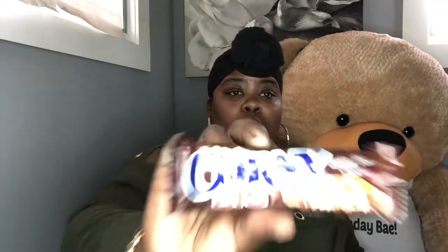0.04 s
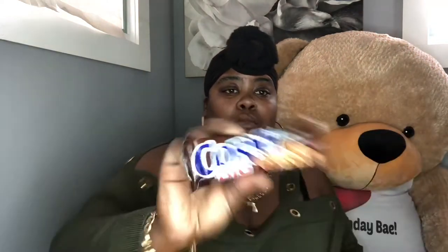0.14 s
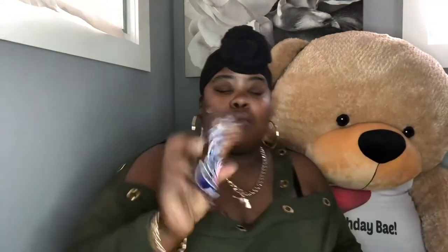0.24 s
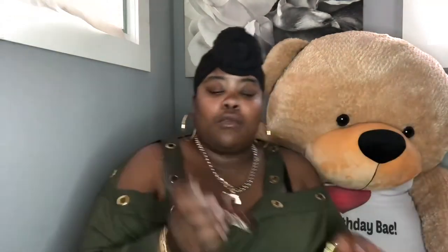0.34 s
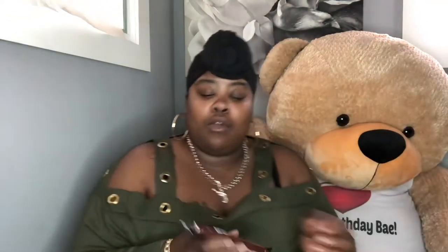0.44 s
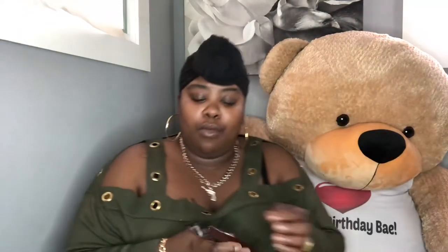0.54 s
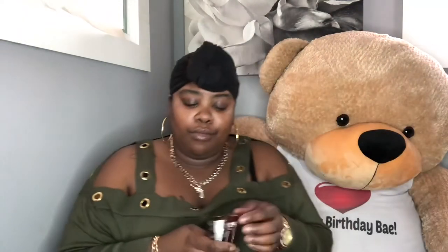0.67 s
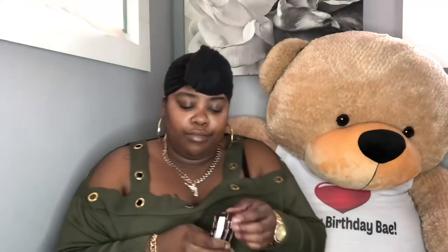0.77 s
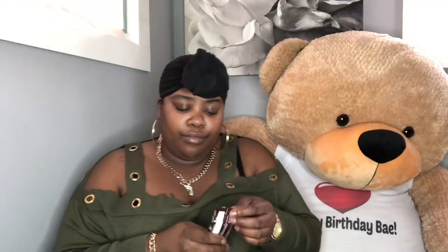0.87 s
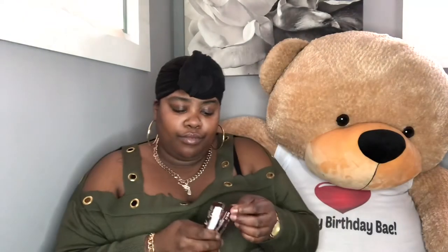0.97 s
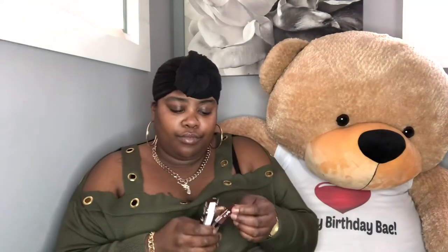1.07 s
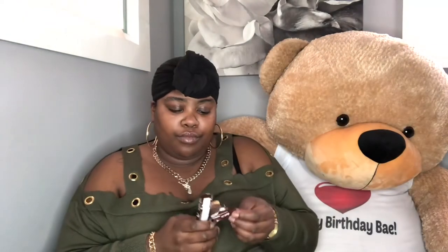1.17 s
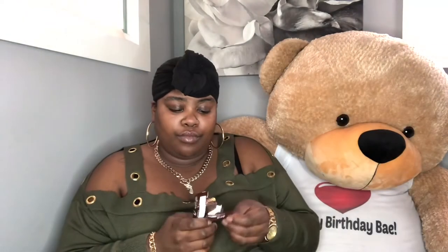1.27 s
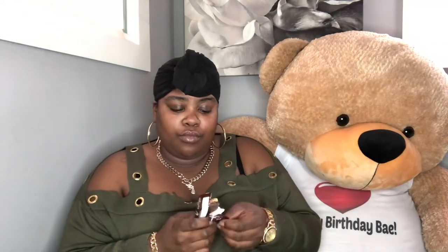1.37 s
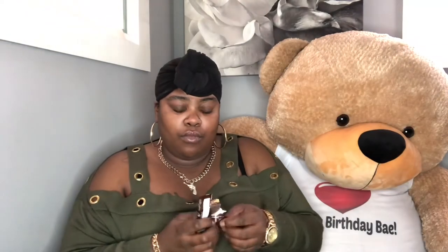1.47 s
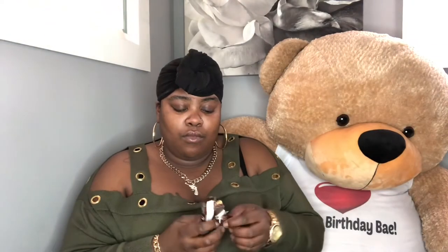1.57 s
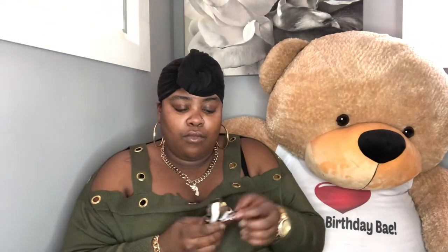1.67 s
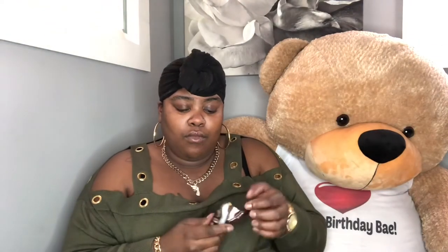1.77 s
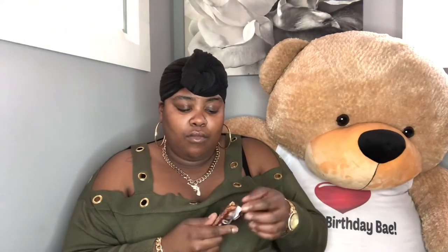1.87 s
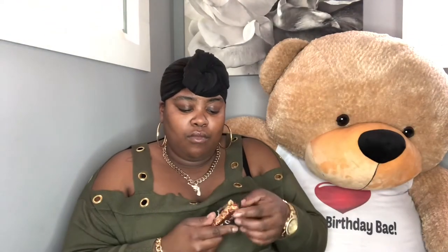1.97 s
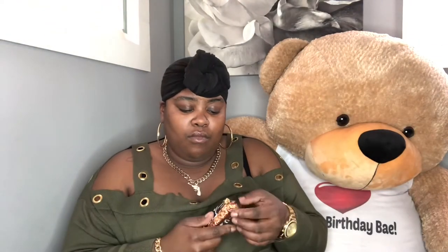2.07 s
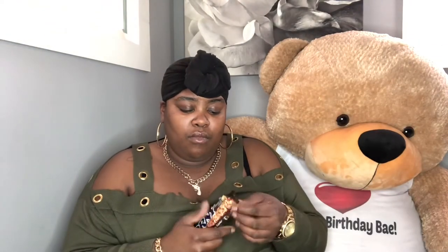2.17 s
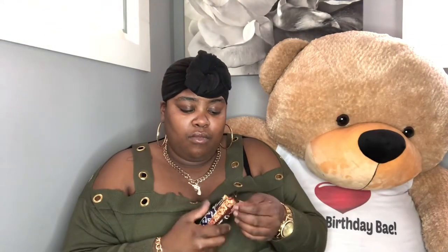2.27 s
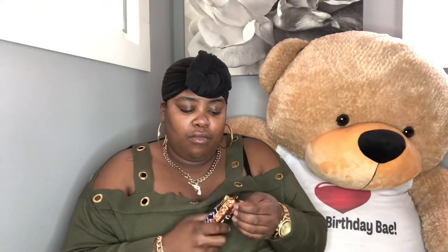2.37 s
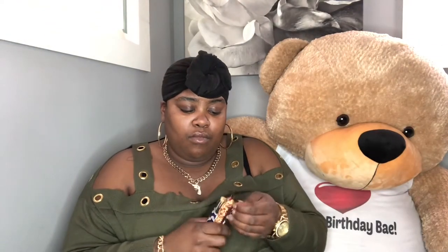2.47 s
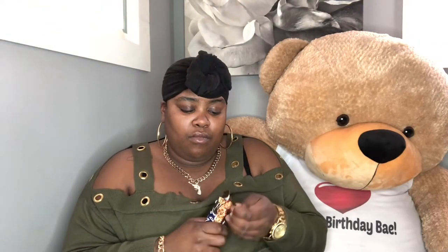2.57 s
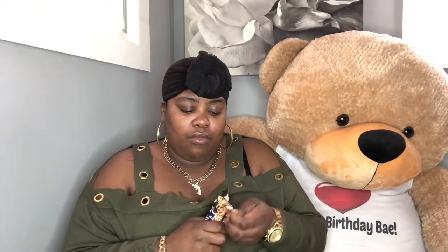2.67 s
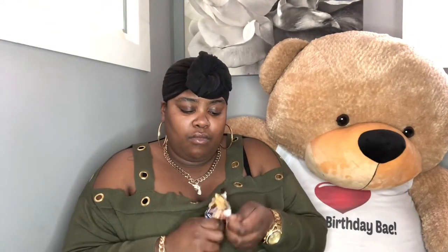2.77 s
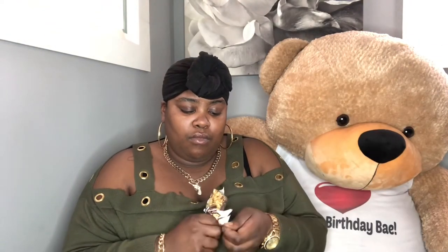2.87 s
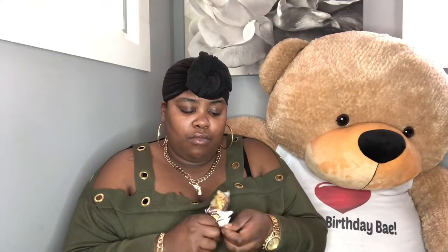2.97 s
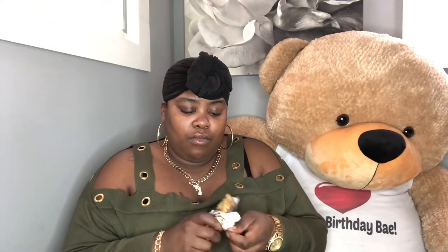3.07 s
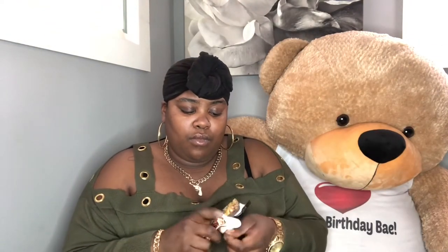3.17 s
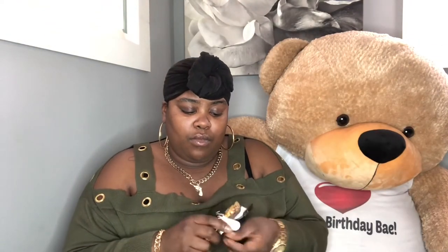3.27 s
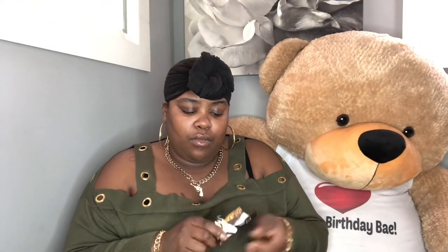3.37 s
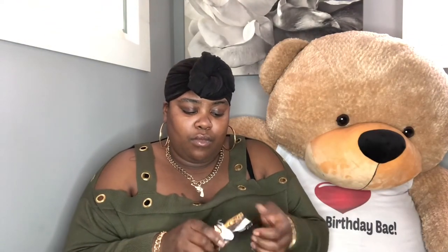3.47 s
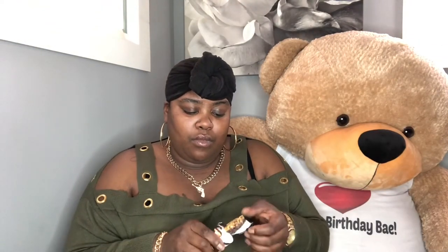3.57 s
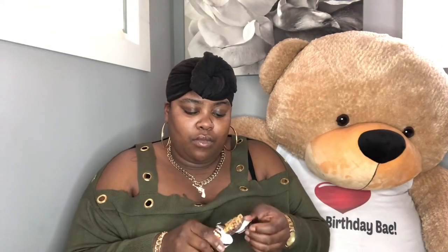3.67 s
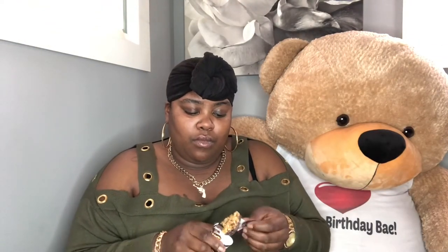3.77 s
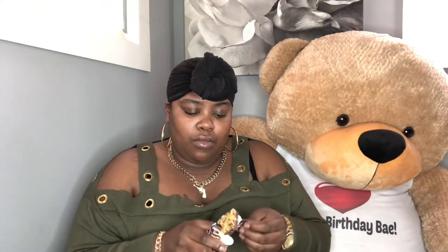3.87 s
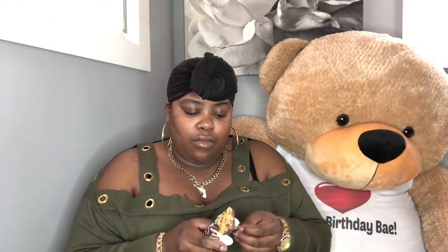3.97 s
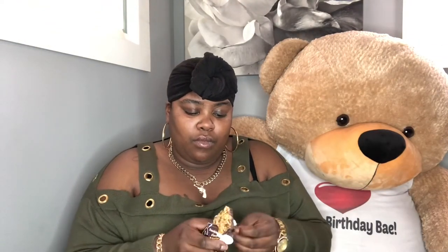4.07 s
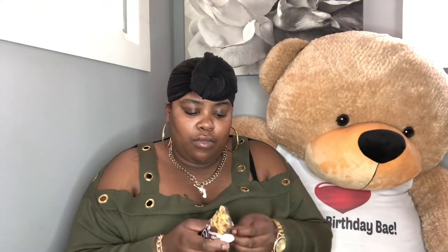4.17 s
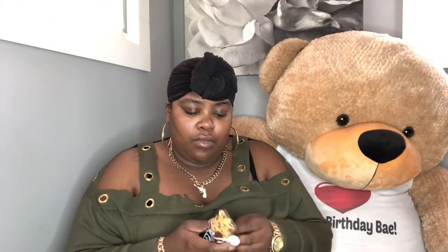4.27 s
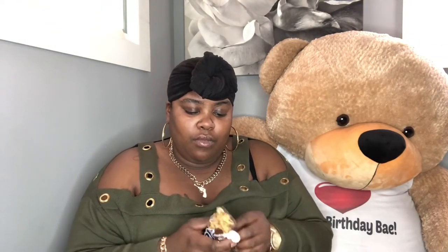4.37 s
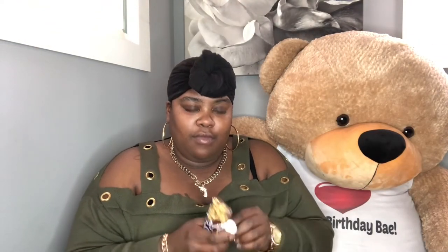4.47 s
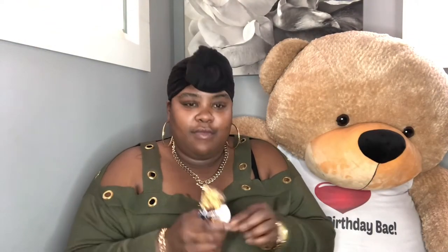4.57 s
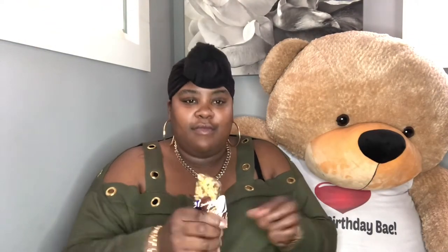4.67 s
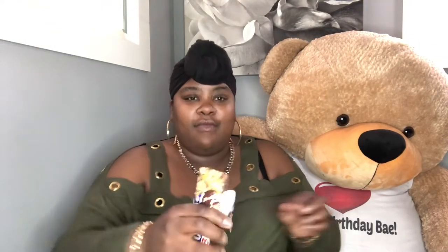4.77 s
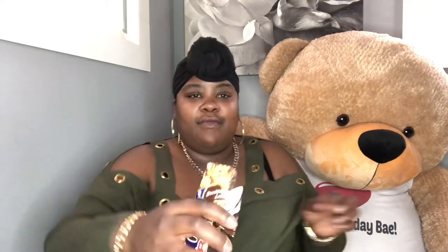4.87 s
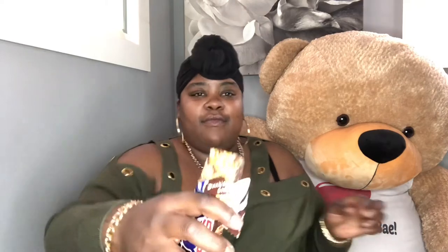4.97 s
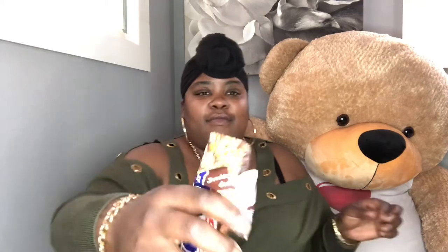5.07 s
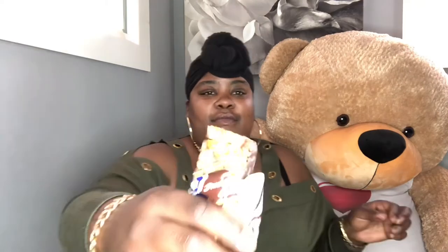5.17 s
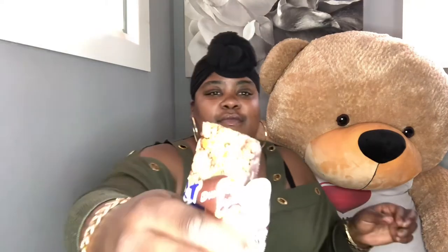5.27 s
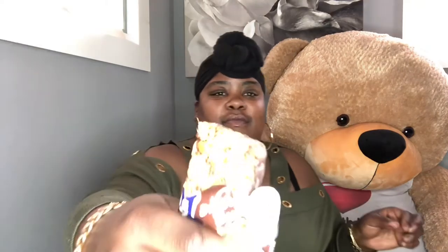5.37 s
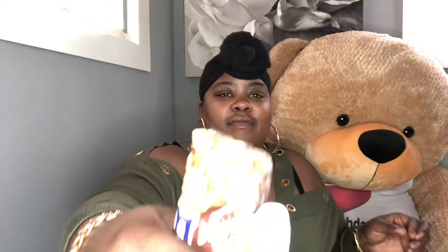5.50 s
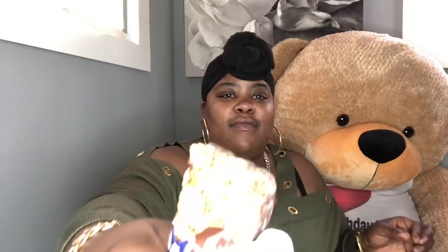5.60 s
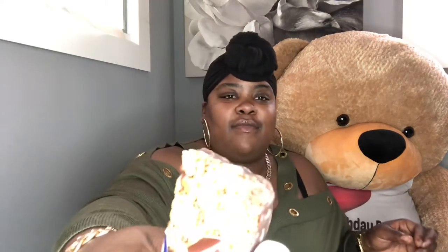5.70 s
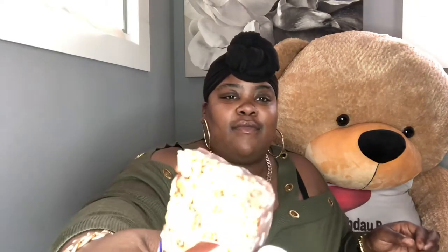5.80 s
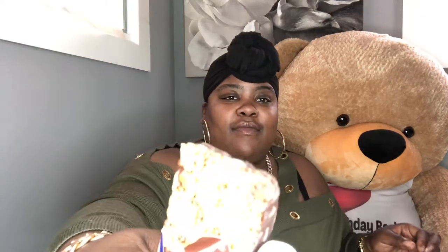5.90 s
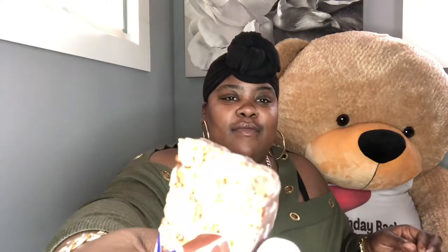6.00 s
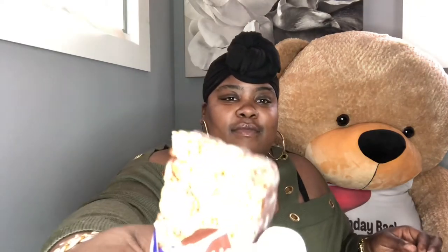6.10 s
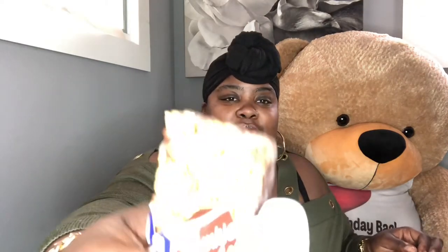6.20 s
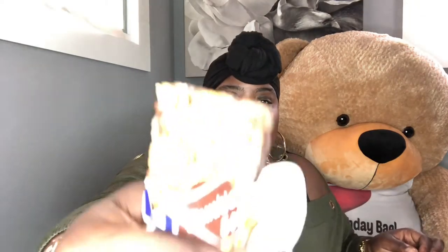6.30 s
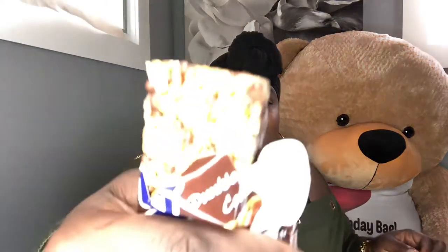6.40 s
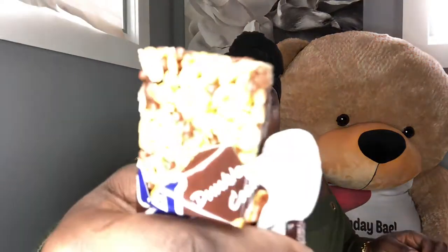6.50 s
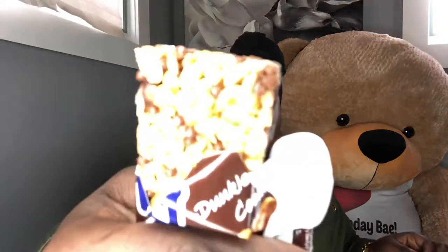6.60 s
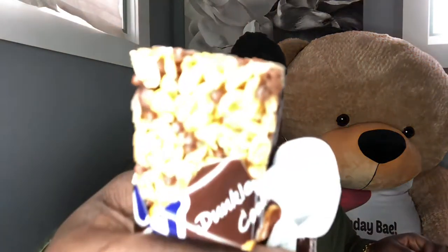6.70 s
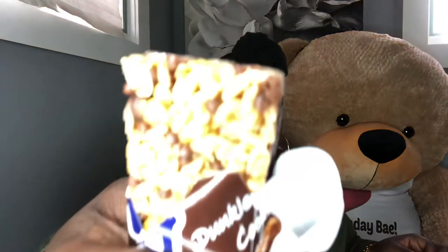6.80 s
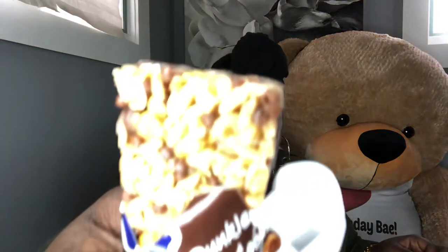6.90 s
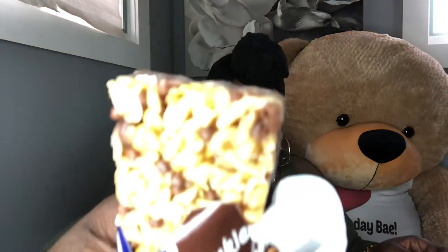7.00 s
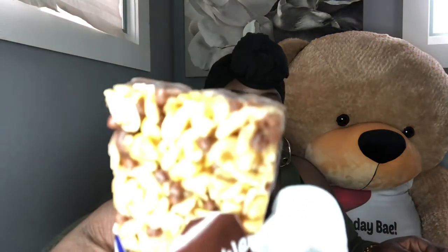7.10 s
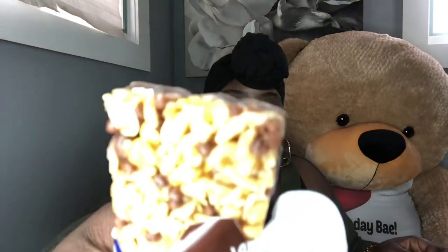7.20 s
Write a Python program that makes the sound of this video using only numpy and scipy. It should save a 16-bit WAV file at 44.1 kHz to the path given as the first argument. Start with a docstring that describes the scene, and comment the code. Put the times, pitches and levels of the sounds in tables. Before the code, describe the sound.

A quiet small furnished room with faint air noise and a barely audible, wavering low hum. At about 0.3-0.5 s a thin plastic wrapper is gripped in a quick bright flurry of crackles, with a tiny high metallic bracelet ping. A near pause follows, with one crisp snap at 1.0 s. From 1.3 to 1.7 s sharp creases snap in clusters, two or three standing out. Lighter crinkling leads to the densest tearing at 2.4-3.0 s, with bright snaps, dull panel pops and squeezed rustling. From 3.1 to 4.9 s irregular softer crackles and short rustles continue, with sharper ticks near 3.7, 4.0 and 4.55 s and a small cluster at 4.9. Then mostly quiet, with a pop at 5.5 s. A brief light crinkle comes at 6.2-6.5 s, nearer and drier, fading to room tone by about 7 s.

```python
"""Snack wrapper torn and crinkled

A thin plastic wrapper is torn and crinkled by hand in a small furnished room, over a faint low hum.
Creases snap as pitched noise bursts, panels pop dully, and squeezed film rustles as clumps of tiny
ringing crackles. Bracelet links ping as damped sines; bounces and a diffuse tail make the room."""
import sys
import numpy as np
from scipy import signal
from scipy.fft import rfft, irfft, next_fast_len
from scipy.io import wavfile
from scipy.ndimage import uniform_filter1d

SR = 44100
rng = np.random.default_rng(int(sys.argv[2]) if len(sys.argv) > 2 else 0)


def dump(signal):
    """Clip the signal to [-1, 1] and save it as 16-bit WAV at the path in sys.argv[1]."""
    limited = np.clip(np.atleast_2d(signal).T, -1, 1)
    pcm = np.round(limited * 32767).astype(np.int16)
    wavfile.write(sys.argv[1], SR, pcm)


def ratio(d):
    """dB to gain"""
    e = np.asarray(d, float) / 20
    return 10 ** e


N = 319725   # samples

# Room tone colour: (frequency [Hz], relative density [dB per Hz])
AIR_COLOUR = [(25, -15), (36, -12), (70, -2.5), (98, -5.5), (163, -10.5), (286, -8.5), (431, -12.5),
              (520, -14), (950, -19.5), (1960, -25.5), (3000, -30.5), (7600, -36), (8400, -38.5),
              (15000, -42)]
AIR_RMS_DB = -63
# Low hum that swells and fades: (time [s], rms level [dB])
HUM_LEVEL = [(0.0, -71), (0.06, -66), (0.62, -90), (0.97, -63), (2.3, -85), (2.48, -65), (2.82, -70),
             (3.01, -90), (3.25, -62), (3.47, -65), (3.53, -82), (3.82, -57), (4.18, -66), (4.7, -57),
             (5.09, -71.5), (7.25, -72)]
HUM_HZ, HUM_SPREAD_HZ = 48.8, 3.52
# Diffuse room tail: (frequency [Hz], t60 [s], level [dB])
ROOM_TAIL = [(400, 0.015, -1.5), (930, 0.33, -7), (2490, 0.15, -6), (5000, 0.18, -7.5), (8000, 0.16, -3.5),
             (14100, 0.11, -12)]
# Bounces off hands, chest and wall: (delay [s], level [dB])
BOUNCES = [(.0021, -23.5), (.0034, -25), (.0085, -49.5)]
# The wrapper comes towards the microphone and the room falls away: (time [s], room share [dB])
ROOM_SHARE = [(0, -0.5), (.9, -1), (4.9, -3.5), (5.2, -2.5), (6.2, -6.5), (7.25, -28)]
# Bracelet links touching: (time [s], click level [dB])
LINK_TOUCHES = [(0.4635, -40), (0.509, -45)]
# Modes of a link: (frequency [Hz], level over click [dB], t60 [s])
LINK_MODES = [(12500, 2, 0.023), (7000, -14, .004)]
# Whole panels flipping over with a dull pop: (time [s], peak level [dB])
PANEL_POPS = [(0.3991,-45.5),(0.4387,-46),(.4438,-35),(1.2945,-40.5),(1.7104,-46),(1.9507,-46.5),(2.1743,-41),(2.493,-40.5),(2.545,-38),
              (2.5592,-37.5),(2.6325,-46),(2.6523,-39),(2.7815,-38),(2.7907,-37.5),(2.8068,-29.5),(2.8544,-39),(2.9854,-43),(2.9989,-33.5),(3.3425,-43),(3.3464,-43),
              (3.653,-44),(4.0208,-40),(4.2033,-42.5),(4.4048,-43.5),(4.5432,-43.5),(4.5577,-41),(4.6783,-37),(4.8697,-50),(4.9168,-44),(5.5002,-33),
              (6.2827,-44.5),(6.4379,-48),(6.5474,-48.5)]
POP_FALL_S = 0.0032   # time to lose 10 dB
# Fingers squeezing the film: (time of firmest grip [s], rustle level [dB],
# time held before it [s, sign ignored], brightness [dB per octave])
SQUEEZES = [(.34,-63.5,.01,-3.5),(0.447,-50,0.013,-4),(1.03,-59.5,0.035,0.5),(1.2,-65,.05,1),(1.5,-60.5,0.22,1.5),(1.68,-58,0.031,-1),(1.92,-59,0.019,1),
            (2.1,-66.5,0.068,-0.5),(2.19,-55.5,0.012,-3),(2.33,-59.5,0.016,-2),(2.48,-53.5,.03,-0.5),(2.68,-54.5,0.046,1),(2.82,-51,0.012,1),(3.1,-50,0.051,0.5),(3.37,-60.5,0.13,-1),(3.5,-60.5,.01,-0.5),
            (3.68,-56.5,0.036,0),(3.78,-60.5,.03,0.5),(3.99,-59.5,0.011,2),(4.198,-54,0.027,-1),(4.461,-50,0.046,-1),(4.76,-52,0.098,0.5),(4.91,-59,0.11,2),
            (6.191,-59,0.027,-2.5),(6.245,-57,0.041,-0.5),(6.3,-73,.01,-7)]
GRIP_DB_PER_S, LET_GO_DB_PER_S = 384, 114   # rise to a grip, fall after it
# Colour of the crackles: (frequency [Hz], level [dB])
FILM_COLOUR = [(500, -6.5), (1000, 3), (2000, 6.5), (4000, 9.5), (6500, 5), (9000, -1), (15000, -1)]
# Creases buckling: (time [s], body peak [dB], crease pitch [Hz], treble edge peak [dB],
# time to lose 10 dB [doublings of 1 ms, at most 4 used])
SNAPS = [(.33,-54,5940,-48,7),(0.3565,-33,4540,-31,1.5),(0.3987,-32,3120,-31.5,3.5),(0.4133,-41,5270,-29.5,2),(0.4226,-31.5,2980,-35,4),
         (0.4372,-31,2260,-23,-3.5),(.443,-32.5,2300,-30,2),(0.6871,-40,3350,-47,21),(0.9208,-49.5,5070,-55,7.5),(0.9447,-39,2750,-67,2.5),
         (0.9945,-19.5,5020,-29,0),(1.0554,-37.5,3720,-37,0.5),(1.0614,-41,1540,-41,1.5),(1.15,-49,3600,-70,7.5),(1.186,-46,1930,-70,2.5),
         (1.2934,-30,2510,-64,1.4),(1.312,-22.5,4470,-31,-1),(1.3309,-14.5,4180,-26,-0.5),(1.3919,-39,2460,-61,4),(1.4438,-33,3550,-51,0),
         (1.4527,-21.5,3820,-32,-1.3),(1.458,-35.5,6050,-44,4),(1.4952,-34,5150,-37,0),(1.507,-33,3100,-48,1),(1.5443,-43,6570,-42,2),
         (1.559,-34.5,1870,-27,-3),(1.568,-22,4730,-23.5,-0.5),(1.6079,-29,5000,-30.5,1),(1.637,-27,3440,-36,1.5),(1.6419,-24,2620,-22,1),
         (1.7091,-28,5700,-47,1),(1.8562,-32,5000,-29.5,1.1),(1.902,-31,2300,-57,1),(1.949,-37.5,4700,-48,1.5),(1.996,-32,2230,-45,2.24),
         (2.057,-43,4830,-48,-0.7),(2.0803,-46,4800,-59,0),(2.096,-60,7020,-47,2),(2.1408,-44.5,2790,-54,-4),(2.158,-30,3360,-75,0),(2.1733,-34,7750,-36,2.8),(2.2262,-39,3870,-61,-8),
         (2.2411,-32,3540,-76,0.5),(2.2986,-43,5140,-54,4),(2.3816,-42,2420,-60,3),(2.404,-37.5,2300,-44,3),(2.444,-27.5,4170,-36,0.8),
         (2.463,-37,3900,-56,-0.5),(2.47,-25.5,3600,-34,-1),(2.4936,-23,3430,-57,0),(2.5442,-36.5,1480,-49,2),(2.5586,-31,3160,-61,0.5),
         (2.58,-23.5,2850,-26.5,1.3),(2.6165,-19,4400,-26,.2),(2.6321,-20.5,4000,-16.5,0.3),(2.653,-24,1790,-16,0.64),(2.739,-44,7450,-47,0.5),
         (2.7638,-40,1790,-45,2.5),(2.766,-37,4290,-42,1.2),(2.7766,-25.5,3840,-18.5,2.5),(2.781,-31,1770,-33,1.5),(2.7886,-30.5,4700,-42,4),
         (2.8069,-22.5,2620,-27.5,2.1),(2.854,-20.5,1070,-18.5,1),(2.8647,-45,850,-35,2.5),(2.9402,-28.5,1540,-65,.5),(2.9634,-36.5,3050,-38,2),
         (2.9869,-33,5170,-29,1.5),(2.99,-27,3300,-45,2),(2.999,-17.5,5870,-28,1),(3.02,-36,6480,-47,0),(3.063,-32,1720,-39,3.5),
         (3.112,-29.5,1920,-36.5,1),(3.1896,-40,6830,-48,3),(3.194,-40,5210,-37,1),(3.203,-45,3360,-41,1),(3.233,-39,4900,-39,2),(3.2522,-37.5,3040,-55,0.3),
         (3.2802,-37.5,4760,-45,0.7),(3.3142,-36.5,2550,-44,1.4),(3.3195,-38,6240,-64,-4),(3.3403,-37,4900,-40.5,2),(3.3449,-29,5700,-38,2),
         (3.4741,-29,1750,-65,1.5),(3.482,-28,5200,-64,0),(3.491,-36.5,2720,-62,4),(3.6055,-39,5700,-46,4),(3.659,-43,1880,-50,3.5),
         (3.6693,-33.5,1750,-33,-3),(3.7121,-25,4200,-32,-0.9),(3.811,-25.5,4760,-45,-3.5),(3.8301,-34,1930,-70,2),(3.9295,-45,1410,-59,4),
         (3.9626,-24.5,5760,-20.5,1.54),(4.0225,-32.5,1520,-45,2),(4.1346,-42,3770,-61,1),(4.186,-33,2150,-52,2),(4.2918,-45,1300,-58,4),
         (4.3175,-38.5,2030,-49,1.5),(4.3499,-39.5,2170,-65,4),(4.399,-33.5,2100,-47,1.2),(4.4028,-36,1820,-53,1.5),(4.4233,-41,2150,-46,1),
         (4.4403,-33,2300,-50,0),(4.4851,-33.5,2900,-42,2.8),(4.5089,-34.5,3340,-53,.5),(4.5417,-37.5,830,-56,-0.4),(4.5466,-33.5,3140,-41,-9),
         (4.553,-33,2120,-51,3.5),(4.5578,-22.5,6130,-30.5,1),(4.5757,-39,1370,-37.5,3),(4.5805,-37,3320,-52,4.2),(4.6107,-40,5900,-51,2.5),
         (4.6333,-36,3230,-56,1.2),(4.6485,-42,3450,-46,4),(4.6773,-33.5,3800,-34,2.5),(4.702,-32.5,4540,-39,2),(4.7165,-35.5,3530,-39,2.5),
         (4.7412,-34,2110,-58,4.5),(4.7496,-41,2500,-58,6),(4.8682,-33.5,1190,-44,3.9),(4.8814,-27,1480,-39,0.5),(4.8905,-26,3600,-35,1),
         (4.8992,-34,1060,-39,4),(4.9062,-24.5,4460,-31,-1),(4.916,-34,4630,-44,3),(4.924,-37,1600,-45,-1.5),(5.0592,-37.5,4300,-45,2.2),
         (5.077,-41.5,940,-39,-1),(5.1882,-42,2500,-51,-2),(5.2609,-37.5,2560,-75,0.8),(5.2975,-47,4570,-48,-1.5),(5.499,-27.5,3050,-72,1.5),
         (6.2086,-27,2550,-56,1),(6.237,-40.5,5200,-47,2),(6.2807,-37.5,6240,-54,2.5),(6.284,-38,2100,-58,2.5),(6.3258,-43,2410,-65,0.5),
         (6.341,-49,830,-72,-1.5),(6.3553,-45.5,3100,-58,1.5),(6.383,-39,1700,-35,0.5),(6.416,-46,4840,-51,2.4),(6.4365,-25.5,1040,-64,0.4),
         (6.4865,-50,1710,-81,-11),(6.5467,-36.5,2700,-49,0),(6.7228,-45,1920,-79,0)]
THUMP_UNDER_DB = 24.5   # bending thump below the body


def rms_one(x):
    """Scales to unit rms."""
    return x / np.sqrt(np.mean(x ** 2) + 1e-20)


def at_hz(points, hz, axis=1):
    """Reads a table column on a log-frequency axis."""
    points = np.array(points)
    return np.interp(np.log(hz), np.log(points[:, 0]), points[:, axis])


def at_time(points):
    """Reads a (time, value) table at every sample."""
    return np.interp(np.arange(N) / SR, *np.transpose(points))


def drift(knots_per_s):
    """Slow chance: straight lines between normal knots of spread 1."""
    knots = rng.standard_normal(2000)
    return np.interp(np.arange(N) / SR * knots_per_s, np.arange(len(knots)), knots)


def ring(clicks, hz, t60_s):
    """Damped two-pole resonator: a unit click starts a sine of height 1."""
    radius = ratio(-60 / (t60_s * SR))
    angle = 2 * np.pi * hz / SR
    poles = [1, -2 * radius * np.cos(angle), radius * radius]
    return signal.lfilter([0, np.sin(angle)], poles, clicks + 1e-18)


def bandpass(x, order, low_hz, high_hz):
    """Butterworth band."""
    sos = signal.butter(order, [low_hz, high_hz], "band", fs=SR, output="sos")
    return signal.sosfilt(sos, x)


def burst(noise, low_hz, high_hz, fall_s):
    """A sharp first jolt, then noise losing 10 dB every fall_s, in one band; peak 1."""
    dying = noise * ratio(-10 * np.arange(len(noise)) / SR / fall_s)
    dying[0] = 4.1 * np.sign(noise[0])
    x = bandpass(dying, 3, low_hz, min(high_hz, 0.45 * SR))
    return x / np.abs(x).max()


def room_tone():
    """Steady noise coloured in the spectrum, plus a low sine whose pitch wavers."""
    size = next_fast_len(N)
    hz = np.maximum(np.arange(size // 2 + 1) * SR / size, 1)
    spectrum = rfft(rng.standard_normal(size)) * ratio(at_hz(AIR_COLOUR, hz))
    air = ratio(AIR_RMS_DB) * rms_one(irfft(spectrum, size)[:N])
    cycles = np.cumsum(HUM_HZ + HUM_SPREAD_HZ * drift(2.9)) / SR
    hum = ratio(at_time(HUM_LEVEL)) * np.sqrt(2) * np.sin(2 * np.pi * cycles)
    return air + hum


def room(x):
    """Adds near bounces and a diffuse tail that builds up, then dies band by band."""
    t = np.arange(SR // 2) / SR
    response = np.zeros(len(t))
    for hz in np.geomspace(350, 14000, num=12):
        band = bandpass(rng.standard_normal(len(t)), 2, hz / 1.18, hz * 1.18)
        t60_s = at_hz(ROOM_TAIL, hz)
        decay = ratio(at_hz(ROOM_TAIL, hz, axis=2) - 60 * t / t60_s)
        response += band * decay / np.sqrt(t60_s * SR / np.log(1e6))   # level independent of t60
    response *= np.clip(t / 0.00077, 0, 1)   # build-up [s]
    for delay_s, db in BOUNCES:
        response[round(delay_s * SR)] += ratio(db)
    sent = x * ratio(at_time(ROOM_SHARE))
    return x + signal.fftconvolve(sent, response)[:N]


def bracelet():
    """Small metal links: each click rings high, short modes."""
    clicks = np.zeros(N)
    for s, db in LINK_TOUCHES:
        clicks[round(s * SR)] = ratio(db)
    return sum(ratio(db) * ring(clicks, hz, t60_s) for hz, db, t60_s in LINK_MODES)


def pops():
    """Larger panels flip over: low, short noise bursts."""
    size = 1800
    out = np.zeros(N + size)
    for s, db in PANEL_POPS:
        at = round(s * SR)
        out[at:at + size] += ratio(db) * burst(rng.standard_normal(size), 379, 1300, POP_FALL_S)
    return out[:N]


def grip():
    """Rustle level and brightness: squeezes rise, hold and let go; the loudest dominates the colour."""
    t = np.arange(0, N, 64) / SR
    s, db, held_s, tilt_db = np.transpose(SQUEEZES)[:, :, None]
    rise_db = GRIP_DB_PER_S * np.maximum(s - np.abs(held_s) - t, 0)
    fall_db = LET_GO_DB_PER_S * np.maximum(t - s, 0)
    power = ratio(2 * (db - rise_db - fall_db)) + 1e-30
    total = power.sum(0)
    level = np.sqrt(total)
    tilt = (power * tilt_db).sum(0) / total
    samples_s = np.arange(N) / SR
    return np.interp(samples_s, t, level), np.interp(samples_s, t, tilt)


def rustle():
    """Clumped crackles, each ringing a few cycles on a patch of film, over the slide of skin."""
    level, tilt_db = grip()
    born = rng.random(N) < 2500 * ratio(5.0 * drift(40)) / SR   # crackles per second, clumped
    size = ratio(3.4 * np.minimum(rng.exponential(1, N), 4))
    crackles = born * size * rng.choice([-1, 1], N)
    patch_of = rng.integers(0, 16, N)
    slide = rng.standard_normal(N)
    out = 0
    for k, hz in enumerate(np.geomspace(500, 15000, num=16)):
        push = rms_one(crackles * (patch_of == k)) + ratio(-5) * np.roll(slide, 997 * k)
        # rung twice: a soft, narrow contact
        contact = ring(push, hz, 4.2 / hz)
        patch = rms_one(ring(contact, hz, 2.7 / hz))
        out = out + patch * ratio(at_hz(FILM_COLOUR, hz) + tilt_db * np.log2(hz / 3000))
    return level * rms_one(out)


def snaps():
    """A crease buckles in uneven slips: bright edge, body at its pitch, then a slower bending thump."""
    size, thump_delay = 1800, round(0.001 * SR)   # samples
    out = np.zeros(N + 2 * size)
    for s, body_db, hz, edge_db, doublings in SNAPS:
        at = round(s * SR)
        fall_s = 2 ** min(doublings, 4) / 1000
        pitched, broad, bright, dull, uneven = rng.standard_normal((5, size))
        slips = ratio(2.95 * rms_one(uniform_filter1d(uneven, size=20)))
        body = burst(slips * pitched, hz / 1.407, hz * 1.105 + 400, fall_s)
        body += burst(slips * broad, max(0.58 * hz - 900, 1100), 5500 + 0.19 * hz, 0.87 * fall_s)
        edge = burst(slips * bright, 4500, 15560, 0.83 * fall_s)
        thump = burst(dull, 400, 1700, 0.0008 + 2.8 * fall_s)
        out[at:at + size] += ratio(body_db) * body / np.abs(body).max()
        out[at:at + size] += ratio(edge_db) * edge
        late = at + thump_delay
        out[late:late + size] += ratio(body_db - THUMP_UNDER_DB) * thump
    return out[:N]


def scene():
    """Wrapper and bracelet sound in the room; the room tone is added dry."""
    sources = bracelet() + pops() + rustle() + snaps()
    return (room_tone() + room(sources))[None]


def band_limit(x):
    """A steep low-pass at the top of the band."""
    return signal.sosfilt(signal.butter(12, 16970, fs=SR, output="sos"), x)


def record(dry):
    """Rolls off the deepest bass and the top."""
    high_pass = signal.butter(2, 34, "high", fs=SR, output="sos")
    low_pass = signal.cheby1(8, 1, 15700, fs=SR, output="sos")   # 1 dB ripple
    mix = signal.sosfilt(low_pass, signal.sosfilt(high_pass, dry))
    return band_limit(mix)


dry = scene()
out = record(dry)
dump(out)
```